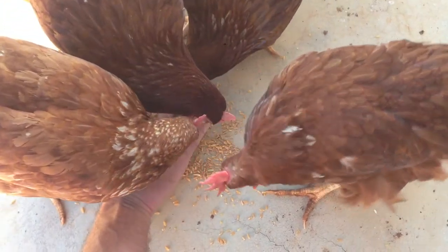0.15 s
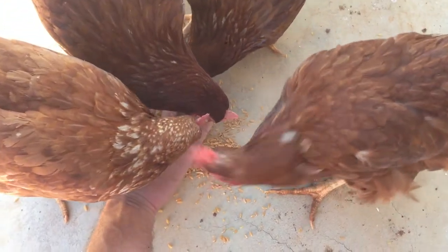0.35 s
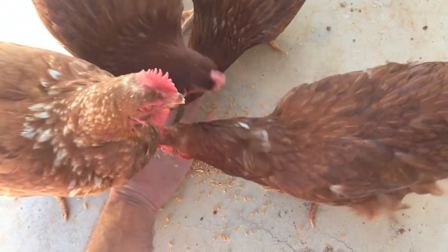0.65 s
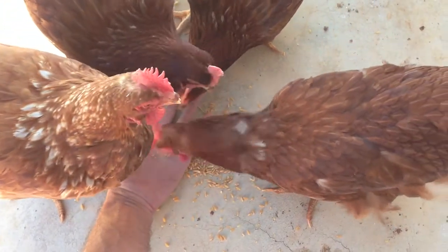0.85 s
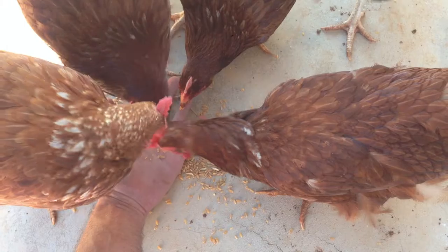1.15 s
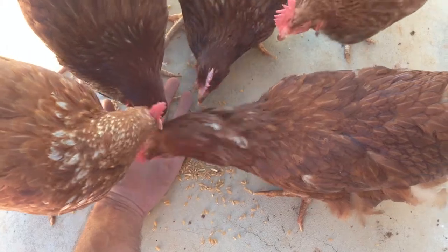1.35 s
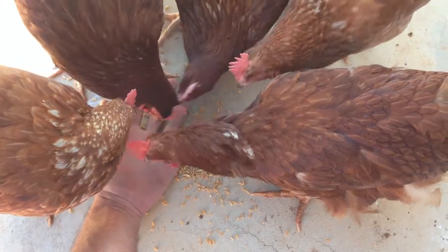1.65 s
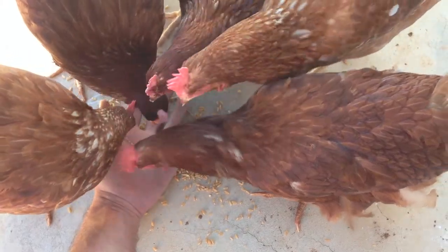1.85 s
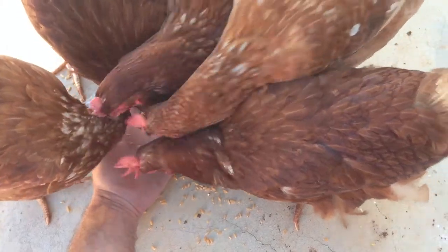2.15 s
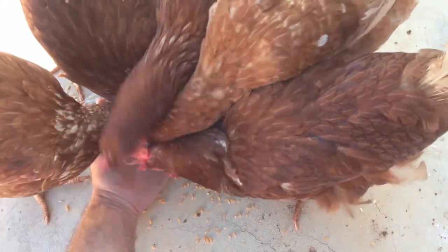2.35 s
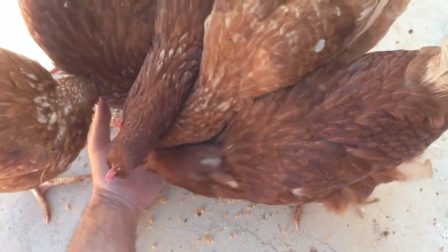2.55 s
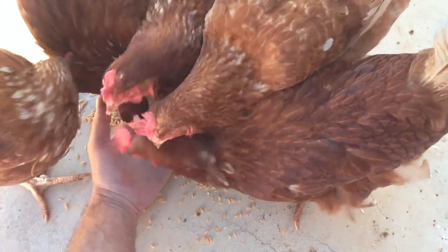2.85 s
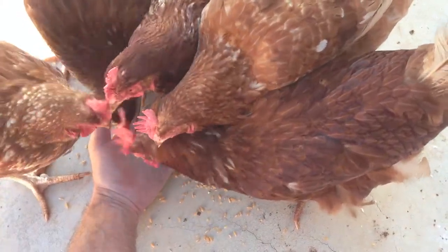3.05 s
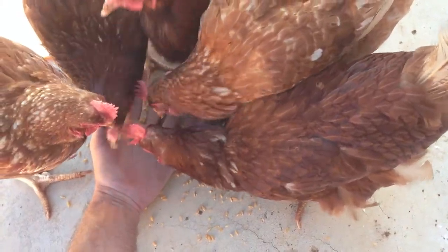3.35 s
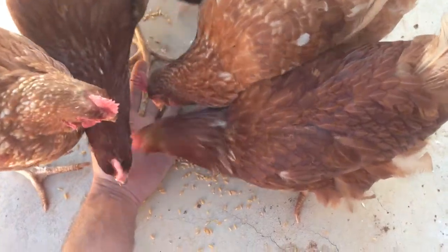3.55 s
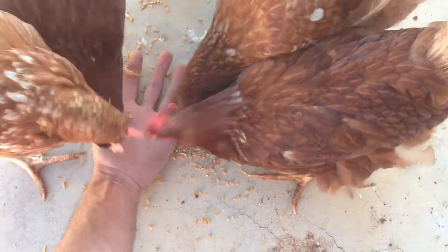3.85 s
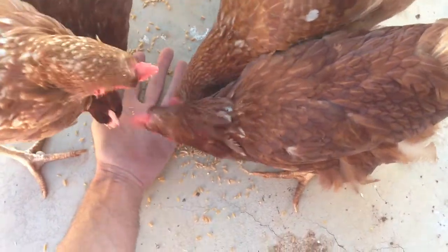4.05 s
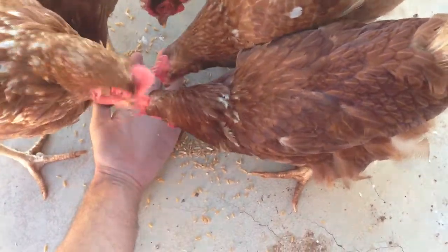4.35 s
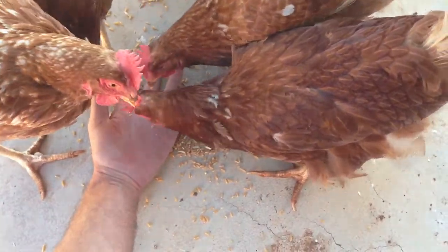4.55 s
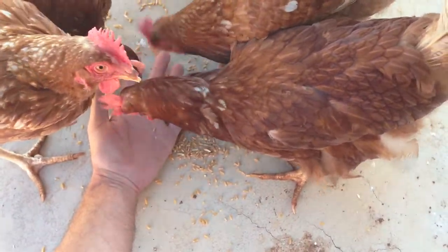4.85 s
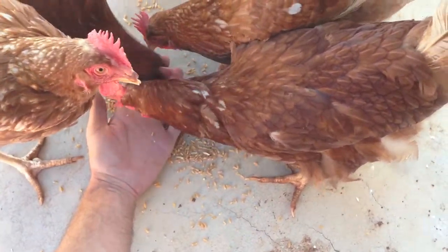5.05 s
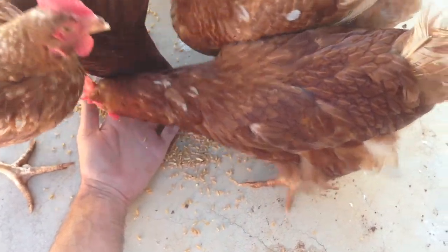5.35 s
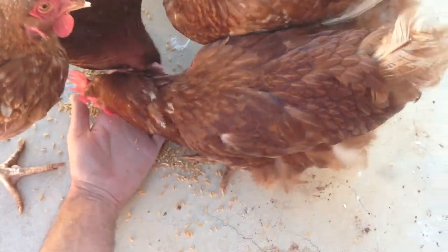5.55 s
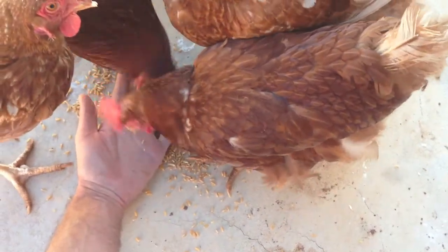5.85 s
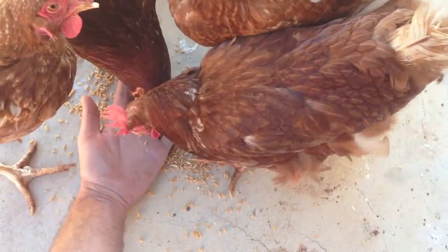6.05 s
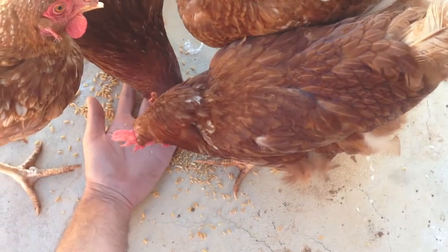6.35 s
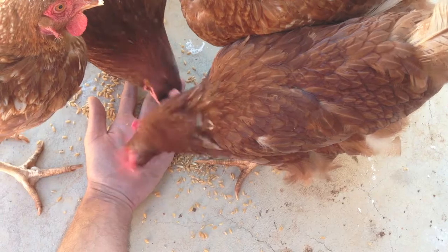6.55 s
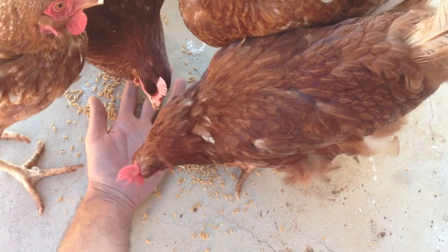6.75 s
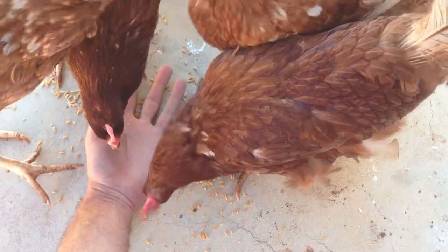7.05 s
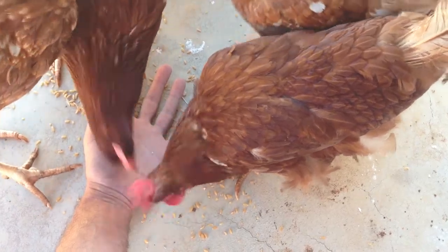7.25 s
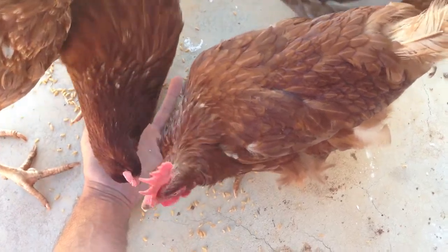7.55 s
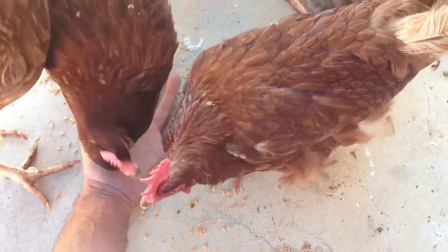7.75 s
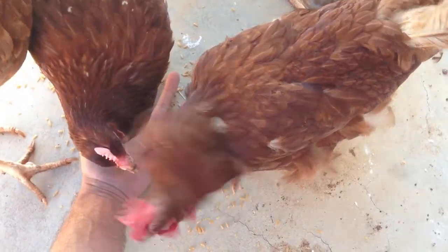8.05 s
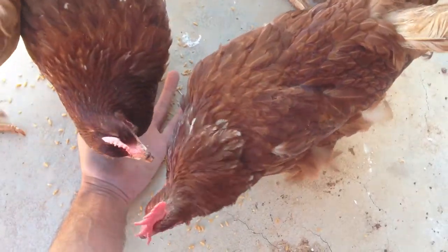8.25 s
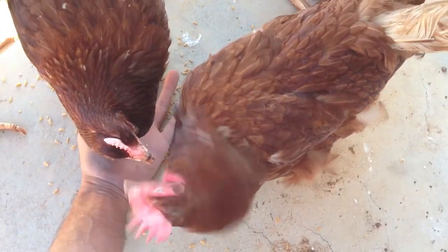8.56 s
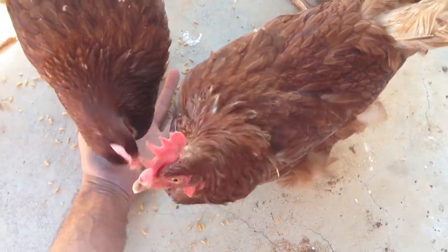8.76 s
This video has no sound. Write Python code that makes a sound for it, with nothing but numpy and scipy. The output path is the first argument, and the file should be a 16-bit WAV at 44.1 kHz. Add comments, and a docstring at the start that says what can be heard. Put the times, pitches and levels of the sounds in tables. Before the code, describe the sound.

Several hens feed from a hand on a concrete floor outdoors, very close to the microphone. Short calls and quick yelps open, then hoarse cackles, thin wavering whines and clear calls that tighten into rasps. Beaks tick on grain throughout, with soft thuds and feather rustle. A low croak precedes two loud climbing wails and a nasal whine, ending with a strong bump over faint air murmur.

```python
"""On a concrete floor outdoors, hens crowd close to the microphone round a hand that holds grain.
Stacks of gliding harmonics, coloured by a throat, give cackles that break into rasps, climbing wails,
yelps, whines and clucks; ringing modes give croak pops. Beaks tick as short rings with noise, soft blows
thud as brief low pulses, and shaped noise brushes as feathers, scuffs as bodies, and lies under it all as
a murmur with hiss. Sparse random echoes add faint reflections to the voices, ticks and thuds."""
import sys
import numpy as np
from scipy import signal
from scipy.fft import rfft, irfft, next_fast_len
from scipy.io import wavfile
from scipy.ndimage import uniform_filter1d

SR = 44100
rng = np.random.default_rng(int(sys.argv[2]) if len(sys.argv) > 2 else 0)


def output_pcm(signal):
    """Save a mono or channel-first signal as 16-bit PCM at the path in sys.argv[1].

    Samples are clipped to [-1, 1] before scaling.
    """
    pcm = np.clip(np.atleast_2d(signal).T, -1, 1) * 32767
    wavfile.write(sys.argv[1], SR, np.round(pcm).astype(np.int16))


N = 392049

# Background colour, shaping noise that is then levelled: [f/Hz, relative level/dB]
BACKGROUND = [(30, -37), (60, -30), (130, -6.5), (270, -1), (550, -8), (1000, -18.5), (1800, -23.5),
              (6200, -22), (15000, -22.5)]
BACKGROUND_DB = -64

# Feathers brushing past each other: [t/s, level/dB, half length/s]
BRUSHES = [(0.184, -58.5, 0.048), (0.9, -61.5, 0.05), (1.397, -57, 0.019), (2.401, -61, 0.013),
           (4.119, -64, .012), (4.337, -58.5, 0.01)]

# Rasp colour for each kind of hen, by name: [f/Hz, relative level/dB]
RASPS = { "hoarse": [(50, -36), (150, -12), (350, -7), (600, -6), (800, -1), (950, -3), (1130, 6),
         (1350, -2), (1650, -7), (2200, -13), (2750, -16), (3200, -24), (4100, -23), (9000, -41)],
         "reedy": [(50, -40), (150, -11), (330, -6), (600, -6), (800, -1), (960, -14), (1150, 0), (1400, 3),
         (1700, 2), (2000, -9), (2250, -27), (2500, -17), (2800, -12), (3000, -30), (3400, -18),
         (3900, -12), (4300, -26), (9000, -40)]}
HALF_LINES, HALF_BLUR = .7, .14  # strength of rasp lines between the harmonics, their unsteadiness/cycles

# Opening calls, one curve each: [t/s, f/Hz, fundamental level/dB,
#  second harmonic/dB and overtones/dB above the fundamental]
OPENING_CALLS = [
    [(.003, 547.6, -49.5, -21, -12), (.03, 505.3, -54.5, -2, -5), (.09, 514.2, -54, -15, -3.5),
     (.14, 567, -47, -24, -12.5), (.22, 531, -49, -26, -18), (.29, 549, -43, -36, -12),
     (.37, 568, -43, -28, -9), (.4, 589, -39.5, -16, -17), (.415, 610, -42, -8, -14)],
    [(.185, 526.4, -46, -12, -32), (.205, 488, -50, 1, -9), (.235, 465.7, -41, -20, -24),
     (.29, 455, -41, -10, -38), (.36, 469, -40, -16.5, -44), (.43, 493, -46, -10, -10.5),
     (.455, 470, -41, -20, -23), (.475, 333, -50, -20, -30)],
]
# Throat colour of their overtones: [f/Hz, level/dB]
OPENING_THROAT = [(1350, 7), (1530, 6), (1690, -3), (2040, -6), (2230, -37), (2550, -21), (2800, -12),
                  (3060, -23), (3350, -20), (3950, -8.5), (4500, -10.5), (5600, -36), (10000, -33)]
OPENING_RASP_DB = -66  # at the loudest point of the call

# Beak on grain: [t/s, bright snap level/dB, dull knock level/dB], both before their trims
PECKS = [(0.2867, -46, -69), (0.671, -44, -67), (0.886, -39, -65), (1.1582, -46, -63),
         (1.896, -42.5, -59.5), (2.2623, -46, -72), (2.4438, -36.5, -72), (2.8896, -60, -62),
         (2.991, -39, -82), (3.362, -44.5, -70), (3.5861, -35.5, -81), (3.654, -42.5, -72),
         (4.214, -48, -64.5), (4.668, -42, -61), (5.0291, -48, -58), (5.227, -43, -58.5), (5.466, -51, -66),
         (5.5653, -41.5, -81), (5.9612, -39.5, -66.5), (8.093, -38, -64)]
SNAP_TRIM_DB, KNOCK_TRIM_DB = -2, 10
# Ringing modes of the beak: [nominal f/Hz, relative level/dB, t60/s]
BEAK_MODES = [(4360, -22, .016), (6260, 5.5, 0.018), (7990, 4.5, 0.019), (10000, 8.5, 0.0057),
              (13400, 4, .01)]

# Bouts of yelps: [start t/s, end t/s]
YELP_BOUTS = [(.412, 0.622), (.8, 1.153)]
# Yelps that swoop from a thin falsetto to a full note: [t/s, hold/s, swoop into it/s, falsetto f/Hz,
#  falsetto level/dB, note f/Hz, note fundamental level/dB, second harmonic/dB and overtones/dB above it]
YELPS = [(0.425, 0.0034, 0.0082, 933, -52, 839, -48, -22, -14),
         (0.466, 0.0038, 0.02, 1059, -64, 690, -48.5, -20, -10),
         (0.496, 0.0048, .012, 967, -56.5, 797, -49, -7, -3),
         (.518, 0.0016, 0.0091, 1172, -47, 860, -53, -18, -2),
         (.545, 0.075, 0.018, 1130, -53, 598.5, -34.5, -13, -18.5),
         (0.823, 0.013, .017, 863, -50, 577.4, -35, -14.5, -27),
         (0.889, 0.012, 0.037, 865, -54.5, 630, -37, -7, -16),
         (0.931, 0.00473, 0.0129, 896, -56, 730, -44.5, -3, -11),
         (0.972, 0.056, 0.019, 894, -45.5, 566, -32, -19, -17.5),
         (1.04, 0.0087, 0.0044, 760, -45, 733, -42.5, -3, -9),
         (1.088, 0.068, .022, 945, -48, 604, -30, -13.5, -12)]
CATCH_HOLD_S, YELP_RASP_DB = .007, -60  # spread of the full voice around each note; rasp level
FALSETTO_WOBBLE, FALSETTO_FLUTTER_DB = 0.027, 3.5  # unsteadiness in pitch (share) and level, rms
# Falsetto colour against pitch: [f/Hz, second harmonic/dB above the fundamental]
FALSETTO_SECOND = [(650, -7), (800, -1), (930, -1), (1060, -15)]
FALSETTO_OVERTONES_DB = -13
# Throat colour of the yelps' overtones: [f/Hz, level/dB]
YELP_THROAT = [(1400, 15), (1750, -1.5), (2050, -5), (2350, -25), (2900, -9.5), (3350, -29), (3850, -12),
               (4300, -20.5), (6000, -35.5), (10000, -39)]

# Short whines, gliding evenly: [start t/s, end t/s, first f/Hz, last f/Hz before the droop,
#  fundamental level/dB, second harmonic/dB and overtones/dB above it]
WHINES = [(0.958, 1.059, 401, 406, -47.5, -5.5, -27), (1.135, 1.24, 869, 1160, -52, -29, -22),
          (6.232, 6.325, 372, 435.5, -43, -9, -31), (7.561, 7.658, 441, 452, -44, -16, -45)]
# One moan, with the columns of the short whines
MOAN = (8.718, 9, 309, 354, -63, 10.5, 1.5)
# Throat colour of the whines' overtones: [f/Hz, level/dB]
WHINE_THROAT = [(1000, 24.5), (1400, 12), (2050, -5), (2600, -17), (3150, -9.5), (3800, -22.5),
                (10000, -41)]
# Throat colour of the moan's overtones: [f/Hz, level/dB]
MOAN_THROAT = [(1300, 12.5), (1600, -2.5), (2300, -4), (2900, -20), (3300, -3.5), (3800, -33), (9000, -42)]
WHINE_ATTACK_S, DROOP, DROOP_S = 0.014, 0.22, .012  # DROOP: share of pitch lost at the stop
WHINE_FADE_S, WHINE_FADE_DB = 0.014, -10  # it weakens before it stops

# Soft blows on the palm and the microphone's holder: [t/s, level/dB before the low cut, f/Hz]
THUDS = [(1.041, -38.5, 173), (1.059, -34, 182), (1.223, -35.5, 203), (1.254, -27, 197), (1.468, -41, 160),
         (1.704, -35, 215), (1.719, -42, 116), (5.064, -49, 280), (6.601, -31, 153), (8.732, -18.5, 226),
         (8.764, -32, 153)]

# Bodies rubbing against the hand and the microphone's holder: [t/s, level/dB, half length/s]
RUBS = [(1.197, -53, 0.044), (1.788, -52, 0.025), (8.67, -55.5, 0.12)]

# Cackles: [start t/s, break t/s, end t/s, attack/s, catch/s, time the break takes/s,
#  clear f/Hz, its climb/share per s, pressed f/Hz, its climb/share per s, clear level/dB, pressed level/dB,
#  second harmonic/dB when clear and when pressed, overtones/dB, their gain/dB toward the end,
#  rasp level/dB at the break, last push/0-1, treble tilt/dB, kind of hen]
CACKLES = [ (1.323, 1.334, 1.536, 0.017, 0.0023, 0.0071, 644, -0.057, 589.6, -0.0096, -46, -39, -5, -10.5, -32, 16.5, -45, .3, 7.5, "hoarse"),
           (1.526, 1.738, 1.908, 0.0074, 0.031, 0.0075, 602.4, -0.072, 602.5, -0.31, -40, -39.5, -13, -11.5, -23, 20.5, -47.5, 0, -2.5, "hoarse"),
           (4.474, 4.688, 4.883, 0.098, 0.057, 0.056, 498.2, 0.13, 511, 0.27, -42, -39.5, -4.5, -20, -15, 9, -52.5, 0.4, -16, "reedy"),
           (5.093, 5.241, 5.427, 0.036, 0.038, 0.0036, 566.6, 0.34, 531.4, 0.38, -39.5, -36.5, -28.5, -33, -13.5, 9.5, -53, 0.83, -9, "reedy"),
           (5.637, 5.79, 5.895, 0.012, 0.039, .007, 598.4, .5, 561.3, -0.37, -36, -33.5, -16, -20, -15, 9, -49.5, 0.8, -1, "reedy"),
           (6.102, 6.243, 6.404, 0.019, 0.04, 0.0044, 591.6, 0.15, 564, 0.21, -36, -32, -7, -17, -10.5, 4.5, -51, 0.85, -1, "reedy"),
           ]
CATCH_DIP, CATCH_SECOND_DB, CATCH_OVERTONES_DB = .095, 4, -1.5  # share of pitch lost; colour change
SWITCH_S, RASP_GROWS_S = 0.0037, 0.015  # time to change register, and extra time to turn hoarse
PRESS_SWELL_DB, RASP_CLEARS_DB = 2, -17.5  # change from the break to the end
BRIGHTEST_AT = 0.75  # share of the way from the break to the end
PUSH_S, PUSH_DB, PUSH_SECOND_DB = 0.025, 3.5, 11  # a last push before the cut-off
SCOOP, SCOOP_S, END_DROOP = 0.29, 0.0075, 0.08  # share of pitch a cackle starts high by, and loses as it stops
# Throbbing stretches: [start t/s, end t/s, first beat f/Hz, last beat f/Hz, depth/0-1]
THROBS = [(1.332, 1.531, 66.7, 27.6, 0.51), (1.729, 1.819, 40.7, 22, 0.58)]
THROB_SAG = 0.013  # pitch change, as a share, per unit of throb gain
# Instants when the pressed voice slips up: [t/s, half length/s, rise/share of pitch, overtones change/dB]
CRACKS = [(1.807, 0.012, 0.06, 3.5), (4.83, 0.012, 0.092, -9), (5.266, .01, 0.15, -14),
          (6.238, 0.012, 0.046, -5)]
# Throat colour of cackle overtones for each kind of hen, by name: [f/Hz, level/dB]
THROATS = { "hoarse": [(1750, -2), (1810, -7), (2370, -11), (2950, -13), (3550, -20), (4150, -20),
           (4700, -32), (10000, -38)], "reedy": [(1400, 1), (1680, -4.5), (1800, -12.5), (2020, -12),
           (2230, -33), (2420, -21), (2700, -20), (2820, -16.5), (3000, -32), (3200, -23), (3400, -26),
           (3850, -12), (4200, -29), (4500, -29.5), (6000, -45), (8300, -37.5), (10000, -46)]}

# Clucks: [start t/s, end t/s, middle f/Hz, fundamental level/dB,
#  second harmonic/dB and overtones/dB above it]
CLUCKS = [(3.743, 3.795, 275, -43.5, 2.5, -19.5), (7.099, 7.121, 277, -48, 13.5, -16.5),
          (7.509, 7.575, 270.2, -42.5, 5.5, -22.5)]
# Throat colour of the clucks' overtones: [f/Hz, level/dB]
CLUCK_THROAT = [(800, 23), (1100, 13), (1400, -12), (1700, -0.5), (2250, -24), (9000, -34)]
CLUCK_ATTACK_S, CLUCK_CLIMB_PER_S = 0.017, 1

# Wavering whines, one curve each: [t/s, f/Hz, fundamental level/dB]
WAVERING_WHINES = [
    [(3.79, 554, -59), (3.836, 642, -45.5), (3.888, 681, -58.5), (3.916, 840, -47), (3.972, 884, -45.5),
     (4.024, 927, -58), (4.07, 956, -47.5), (4.18, 993, -50), (4.192, 855, -49.5), (4.205, 790, -70)],
    [(4.274, 860, -61), (4.29, 1142, -60), (4.33, 1035, -53.5), (4.394, 1102, -47.5), (4.4, 1037, -54),
     (4.414, 790, -52)],
    [(5.94, 390, -52), (5.988, 317, -62.5), (6.03, 309, -42), (6.056, 380, -43), (6.115, 427, -46.5)],
    [(6.52, 428, -66), (6.54, 376.5, -48.5), (6.572, 394, -56), (6.61, 380.4, -45.5), (6.694, 469, -44.5),
     (6.71, 600, -44), (6.735, 600, -71)],
]
# Their colour against pitch: [f/Hz, second harmonic/dB above the fundamental]
WHINE_SECOND = [(310, 0), (380, -11.5), (450, 2), (600, -9.5), (850, -19.5), (1000, -30)]
# The same for the overtones: [f/Hz, overtones/dB above the fundamental]
WHINE_OVERTONES = [(310, -28.5), (400, -37), (650, -22), (1000, -23)]

# Single pops of a slow throaty croak: [t/s, peak level/dB]
CROAKS = [(7.128, -38.5), (7.148, -39), (7.168, -40.5), (7.192, -49), (7.236, -46)]
# Ringing modes of a croak: [nominal f/Hz, relative level/dB, t60/s]
CROAK_MODES = [(586, 10, 0.055), (880, 12, 0.03), (1154, 10, 0.04)]

# Long wails: [start t/s, end t/s, first f/Hz, top f/Hz, bend of the climb, first level/dB, last level/dB,
#  first and last second harmonic/dB, overtones/dB, rasp level/dB before it clears]
LONG_WAILS = [(7.623, 8.161, 484.4, 573.7, 1.8, -36, -27, -11.5, -9.5, -22, -61),
              (8.26, 8.561, 508.3, 628.6, 1.35, -38, -36, -9, -2.5, -17.5, -44)]
# Throat colour of each wail's overtones, one list per wail: [f/Hz, level/dB]
WAIL_THROATS = [
    [(1530, 4), (1720, -14.5), (1900, -10), (2060, -14.5), (2300, -6), (2870, -6.5), (3060, -17.5),
     (3550, -8.5), (4050, -24), (4600, -29), (6500, -36), (8000, -27.5), (10000, -49)],
    [(1680, 6), (1860, 0), (2090, -15), (2260, -6), (2500, -5.5), (2660, -6), (2850, -4), (3100, -10.5),
     (3250, -12), (3450, -10), (3700, -13.5), (4340, -22.5), (6500, -31), (8000, -32), (10000, -47)],
]
WAIL_ATTACK_S, WAIL_SAG_S, WAIL_SAG_PER_S = 0.036, .062, 0.56
WAIL_BRIGHTEN_DB, WAIL_HOARSE_S = 6, 0.044  # brightening over the call; hoarse time at either end
WAIL_CLEARS_DB = -9  # a wail ends less hoarse than it starts
BEAK_SHUT_DB, BEAK_OPENS_AT = -11, 0.16  # overtones are muffled for this first share of a wail

# One long nasal whine: [t/s, f/Hz, second harmonic level/dB, overtones/dB above the second harmonic]
NASAL_WHINE = [(7.912, 279.7, -45.5, -26), (7.983, 308.3, -40.5, -22.5), (8.005, 371.3, -47, -20),
               (8.1, 452.8, -37.5, -36), (8.182, 464.3, -42, -23.5), (8.27, 487, -37.5, -25),
               (8.31, 471, -38.5, -21), (8.461, 480, -34, -31.5), (8.525, 533.6, -32.5, -27),
               (8.54, 503, -32.5, -25), (8.568, 535, -33.5, -21.5), (8.619, 517, -33.5, -21.5),
               (8.708, 538, -33.5, -21.5), (8.737, 562, -39, -37)]
# Its colour against pitch: [f/Hz, second harmonic/dB above the fundamental]
NASAL_SECOND = [(290, 2.5), (385, -3), (440, 12), (475, 18.5), (520, 7)]
NASAL_RASP_DB, NASAL_RASP_S = -46.5, 0.055  # it ends in a rasp

RELEASE_S, SILENT_DB = 0.016, -33  # release of the calls, and gain at their outer edges
EDGE_HZ = 15350  # top of the band


def amp(db):
    """Turns decibels into gain."""
    return 10 ** (np.asarray(db) / 20)


def evened(x):
    """Levels a sound to rms 1."""
    return x / np.sqrt(np.mean(x ** 2) + 1e-20)


def read(points, hz):
    """A spectrum joined by straight lines on a log-frequency axis."""
    f, value = np.transpose(points)
    return np.interp(np.log(hz + 1), np.log(f + 1), value)


def filtered(x, points):
    """Filters x by a spectrum."""
    size = next_fast_len(len(x))
    gain = amp(read(points, np.fft.rfftfreq(size, 1 / SR)))
    return irfft(rfft(x, size) * gain, size)[:len(x)]


def coloured(x, points):
    """Filters x by a spectrum; rms 1."""
    return evened(filtered(x, points))


def add(mix, s, sound):
    """Lays a sound into the mix at s seconds, cut off at the end of the mix."""
    part = mix[max(round(s * SR), 0):][:len(sound)]
    part += sound[:len(part)]


def wander(size, hz):
    """Smooth chance that moves up to about hz times a second; rms near 1."""
    full = next_fast_len(size + SR // 10)
    f = np.fft.rfftfreq(full, 1 / SR)
    spectrum = rfft(rng.standard_normal(full)) * np.exp(-.5 * (f / hz) ** 2)
    return evened(irfft(spectrum, full))[:size]


def ring(modes, t, spread):
    """Dying modes, a little different in pitch at each blow; peak 1."""
    x = np.zeros(len(t))
    for hz, db, t60 in modes:
        shifted_hz = hz * (1 + spread * rng.uniform(-1.4, 1))
        x += amp(db - 60 * t / t60) * np.sin(2 * np.pi * shifted_hz * t)
    return x / abs(x).max()


def step(t, at, width):
    """A smooth change from 0 to 1 around time at."""
    return .5 + .5 * np.tanh((t - at) / width)


def bursts(t, strokes):
    """Sum of bell-shaped noise strokes."""
    return sum(amp(db) * np.exp(-((t - s) / width) ** 2) for s, db, width in strokes)


def call_span(start, end, attack):
    """Times of a call, its progress from 0 to 1, and the dB of its attack and release."""
    t = np.arange(start, end, 1 / SR)
    shut = np.maximum(1 - (t - start) / attack, 0) ** 2 + np.maximum(1 - (end - t) / RELEASE_S, 0) ** 2
    return t, (t - start) / (end - start), SILENT_DB * shut


def follow(curve):
    """Times, pitch and level along a curve."""
    s, hz, db = np.transpose(curve)
    t, _, gate_db = call_span(s[0] - .003, s[-1] + 0.006, 0.002)
    return t, np.interp(t, s, hz), np.interp(t, s, db) + gate_db


def background():
    """A low outdoor murmur of air that swells slightly, and even hiss."""
    air = coloured(rng.standard_normal(N), BACKGROUND)
    murmur = signal.sosfiltfilt(signal.butter(2, 600, fs=SR, output="sos"), air)
    hiss = air - murmur
    swell = amp(1.3 * wander(N, 10))
    return amp(BACKGROUND_DB) * (hiss + murmur * swell)


def jostling():
    """Feathers brush in short strokes; claws and beaks shift small grains."""
    t = np.arange(N) / SR
    strokes = amp(-70 + 2.73 * wander(N, 20)) + bursts(t, BRUSHES)
    feather_colour = [(200, -7.0), (900, 3.5), (4000, -2.0), (6500, -5.5), (14000, -13.5)]
    feathers = coloured(rng.standard_normal(N), feather_colour) * strokes
    # About 25 grains a second, of uneven strength, each a dying puff of noise
    strength = amp(7.4 * np.minimum(rng.exponential(1, N), 3)) * (rng.random(N) < 25 / SR)
    grains = signal.oaconvolve(strength, np.exp(-t[:SR // 50] / 0.0027))[:N] * rng.standard_normal(N)
    return feathers + amp(-80) * coloured(grains, [(500, -32.0), (3500, -6.5), (14000, -6.0)])


def hens():
    """All the voices, each kind of call with its own throat and unsteadiness."""
    out = np.zeros(N)
    for curve in OPENING_CALLS:
        add(out, *call(opening_call(curve), OPENING_THROAT, jitter=.012, air_db=-28))
    for row in YELP_BOUTS:
        add(out, *call(yelps(*row), YELP_THROAT, jitter=0.011, air_db=-39, shimmer_db=3, hen="reedy"))
    whines = [whine(*row) for row in WHINES]
    whines += [wavering_whine(curve) for curve in WAVERING_WHINES]
    whines.append(nasal_whine())
    for controls in whines:
        add(out, *call(controls, WHINE_THROAT, jitter=.008, air_db=-26, waver=.006, shimmer_db=1.3))
    for *row, tilt_db, hen in CACKLES:
        throat = tilted(THROATS[hen], tilt_db)
        add(out, *call(cackle(*row), throat, jitter=0.0087, air_db=-31.5, shimmer_db=1.9, hen=hen))
    for row in CLUCKS:
        add(out, *call(cluck(*row), CLUCK_THROAT, jitter=0.0085, air_db=-13, shimmer_db=3))
    for row, throat in zip(LONG_WAILS, WAIL_THROATS):
        add(out, *call(wail(*row), throat, jitter=.007, air_db=-37, waver=.006, shimmer_db=3.2))
    add(out, *call(whine(*MOAN), MOAN_THROAT, jitter=.007, air_db=-14, shimmer_db=1.5))
    return out + croaks()


def call(controls, throat, jitter, air_db, waver=0.0068, shimmer_db=3.5, hen="hoarse"):
    """The syrinx gives a stack of harmonics; in a rasp cycles alternate unevenly and puff air."""
    t, hz, db, second_db, upper_db, rasp = controls
    size = len(t)
    rough = np.clip(rasp / amp(-42), 0, 1)
    turns = np.cumsum(hz * (1 + (waver + .01 * rough) * wander(size, 35))) / SR
    slip = (jitter + .03 * rough) * wander(size, 200)  # timing error in cycles

    def harmonic(k):
        """Each one flutters, feels the timing error k-fold, and is delayed by the throat."""
        delay = 0.43 * np.sqrt(k - 1)
        return amp(shimmer_db * wander(size, 34)) * np.cos(2 * np.pi * (k * (turns + slip) - delay))

    stack = sum((k * hz < 10500) * harmonic(k) for k in range(3, 17))
    overtones = filtered(amp(db + upper_db) * stack, throat)
    fundamental = np.cos(2 * np.pi * (turns + .5 * slip))
    voice = amp(db) * (fundamental + amp(second_db) * harmonic(2)) + overtones
    # Alternating cycles put lines halfway between the harmonics
    halves = sum(np.cos(2 * np.pi * ((k + .5) * turns + HALF_BLUR * wander(size, 85))) for k in range(8))
    pulse = .2 + np.exp(-(turns % 1) / .15)
    puffs = pulse * amp(2.5 * wander(size, 250)) * rng.standard_normal(size)
    husk = evened(coloured(puffs, RASPS[hen]) + HALF_LINES * coloured(halves, RASPS[hen]))
    sound = np.sqrt(2) * voice + husk * (rasp + amp(db + air_db))
    edges = np.clip(np.minimum(t - t[0], t[-1] - t) / 0.0019, 0, 1)
    return t[0], sound * edges


def opening_call(curve):
    """A slightly husky call whose colour shifts as it glides."""
    rows = np.array(curve)
    t, hz, db = follow(rows[:, :3])
    second_db, upper_db = (np.interp(t, rows[:, 0], column) for column in rows.T[3:])
    return t, hz, db, second_db, upper_db, amp(OPENING_RASP_DB + db - db.max())


def yard(x, t60=0.19):
    """Faint scattered reflections from floor and walls: sparse random echoes that die away."""
    t = np.arange(SR // 2) / SR
    taps = rng.standard_normal(len(t)) * (rng.random(len(t)) < 2500 / SR) * (t > .004)
    tail = taps * amp(-60 * t / t60)
    return signal.fftconvolve(x, tail / np.linalg.norm(tail))[:N]


def pecks():
    """A beak snaps on a grain with a short ring; loose grains scrape after it."""
    out, t = np.zeros(N), np.arange(SR // 20) / SR
    scatter = np.exp(-t / 0.0027) + 0.28 * np.exp(-t / 0.018)
    knock_colour = [(300, -23), (2000, -2), (3500, 10.0), (4500, 2), (6500, -11.0)]
    for s, snap_db, knock_db in PECKS:
        snap = ring(BEAK_MODES, t, spread=0.073) + 0.3 * scatter * rng.standard_normal(len(t))
        knock = coloured(rng.standard_normal(len(t)), knock_colour) * scatter
        add(out, s, amp(snap_db + SNAP_TRIM_DB) * snap + amp(knock_db + KNOCK_TRIM_DB) * knock)
    return out


def yelps(start, end):
    """The pitch swoops down from the falsetto, the note catches hold, then flips upward again."""
    t, _, gate_db = call_span(start, end, 0.013)
    (s, hold, swoop, top_hz, thin_db,
     note_hz, note_db, note_second_db, note_upper_db) = np.transpose(YELPS)
    corners = np.maximum.accumulate(np.column_stack([s - swoop, s, s + hold]).ravel())

    def path(falsetto, note):
        """Joins each yelp's falsetto, and the start and end of its note."""
        return np.interp(t, corners, np.column_stack([falsetto, note, note]).ravel())

    away = np.maximum(s - t[:, None], 0) + np.maximum(t[:, None] - s - hold, 0)
    full = np.exp(-(away.min(1) / CATCH_HOLD_S) ** 2)
    thin = 1 - full
    hz = uniform_filter1d(path(top_hz, note_hz), size=150)
    hz = hz * (1 + FALSETTO_WOBBLE * thin * wander(len(t), 100))
    falsetto_db = path(thin_db, thin_db) + FALSETTO_FLUTTER_DB * wander(len(t), 120)
    db = full * path(note_db, note_db) + thin * falsetto_db
    second_db = full * path(note_second_db, note_second_db) + thin * read(FALSETTO_SECOND, hz)
    upper_db = full * path(note_upper_db, note_upper_db) + thin * FALSETTO_OVERTONES_DB
    return t, hz, db + gate_db, second_db, upper_db, amp(YELP_RASP_DB + gate_db)


def whine(start, end, first_hz, last_hz, db, second_db, upper_db):
    """An even glide that droops as the air runs out."""
    t, u, gate_db = call_span(start, end, WHINE_ATTACK_S)
    hz = (first_hz + (last_hz - first_hz) * u) * (1 - DROOP * np.exp((t - end) / DROOP_S))
    fade_db = WHINE_FADE_DB * np.exp((t - end) / WHINE_FADE_S)
    return t, hz, db + gate_db + fade_db, second_db, upper_db, 0


def thuds():
    """Flesh gives way under a blow and springs back within a cycle or two."""
    out, t = np.zeros(N), np.arange(-SR // 40, SR // 20) / SR
    for s, db, hz in THUDS:
        cycles = hz * t
        push = np.cos(2 * np.pi * cycles) / np.cosh(cycles / 0.36)
        rub = coloured(rng.standard_normal(len(t)), [(40, -44), (120, -8), (350, 21), (3000, -49)])
        add(out, s + t[0], amp(db) * (push + amp(-13) * rub / np.cosh(t / 0.0044)))
    return signal.sosfiltfilt(signal.butter(2, 88, "high", fs=SR, output="sos"), out)


def rubs():
    """A soft, low scuffing as the birds lean in."""
    colour = [(40, -33), (110, -9), (220, -7), (450, -17), (2000, -22), (9000, -50)]
    return bursts(np.arange(N) / SR, RUBS) * coloured(rng.standard_normal(N), colour)


def cackle(start, crack, end, attack, catch_s, break_s, clear_hz, clear_climb, pressed_hz, climb,
           clear_db, pressed_db, clear_second_db, pressed_second_db, upper_db, brighten_db, rasp_db,
           last_push):
    """A low catch, a clear tone, then a rasp that swells and tightens into a loud, bright end."""
    t, _, gate_db = call_span(start, end, attack)
    catch = 1 - step(t, start + catch_s, SWITCH_S)
    pressed = step(t, crack, break_s)
    clear = 1 - pressed
    push = last_push * step(t, end - PUSH_S, SWITCH_S)
    effort = np.clip((t - crack) / (end - crack), 0, 1)
    beat = throb(t)

    clear_middle, pressed_middle = (start + catch_s + crack) / 2, (crack + end) / 2
    clear_path = clear_hz * (1 - CATCH_DIP * catch + clear_climb * (t - clear_middle))
    pressed_path = pressed_hz * (1 + climb * (t - pressed_middle))
    scoop = SCOOP * np.exp((start - t) / SCOOP_S)
    droop = END_DROOP * np.exp((t - end) / SCOOP_S)
    hz = (clear * clear_path + pressed * pressed_path) * (1 + scoop - droop + THROB_SAG * (beat - 1))

    db = clear * clear_db + pressed * (pressed_db + PRESS_SWELL_DB * (effort - .5))
    db = db + PUSH_DB * push + gate_db + 20 * np.log10(beat)
    second_db = clear * clear_second_db + pressed * pressed_second_db
    second_db = second_db + CATCH_SECOND_DB * catch + PUSH_SECOND_DB * push
    hoarse = step(t, crack, break_s + RASP_GROWS_S)
    rasp = hoarse * amp(rasp_db + RASP_CLEARS_DB * effort ** 3 + gate_db)
    opening = np.minimum(effort / BRIGHTEST_AT, 1)
    upper_db = upper_db + CATCH_OVERTONES_DB * catch + brighten_db * opening
    for s, width, rise, change_db in CRACKS:
        slipped = np.exp(-((t - s) / width) ** 4)
        hz = hz * (1 + rise * slipped)
        upper_db = upper_db + change_db * slipped
    return t, hz, db, second_db, upper_db, rasp


def throb(t):
    """Gain of the beat between the two sides of the syrinx; 1 where they keep together."""
    gain = np.ones(len(t))
    for start, end, first_hz, last_hz, depth in THROBS:
        left = end - t
        beats = left * (last_hz + .5 * (first_hz - last_hz) * left / (end - start))
        apart = step(t, start, SWITCH_S) * (1 - step(t, end + SWITCH_S, SWITCH_S))
        gain *= abs(1 - depth * apart * np.exp(2j * np.pi * beats))
    return gain


def tilted(throat, tilt_db, from_hz=1700):
    """A throat whose treble is raised or lowered over one octave."""
    return [(hz, db + tilt_db * np.clip(np.log2(hz / from_hz), 0, 1)) for hz, db in throat]


def cluck(start, end, hz, db, second_db, upper_db):
    """One short, low note that lifts a little."""
    t, _, gate_db = call_span(start, end, CLUCK_ATTACK_S)
    lifting_hz = hz * (1 + CLUCK_CLIMB_PER_S * (t - t.mean()))
    return t, lifting_hz, db + gate_db, second_db, upper_db, 0


def wavering_whine(curve):
    """The colour follows the pitch as the harmonics slide through the throat's resonances."""
    t, hz, db = follow(curve)
    return t, hz, db, read(WHINE_SECOND, hz), read(WHINE_OVERTONES, hz), 0


def croaks():
    """Each pop of a throaty croak rings a few dying modes."""
    out, t = np.zeros(N), np.arange(SR // 20) / SR
    for s, db in CROAKS:
        add(out, s, amp(db) * ring(CROAK_MODES, t, spread=0.16))
    return out


def wail(start, end, first_hz, top_hz, bend, first_db, last_db, first_second_db, last_second_db,
         upper_db, rasp_db):
    """Rising effort lifts pitch, level and brightness; the overtones come in as the beak opens."""
    t, u, gate_db = call_span(start, end, WAIL_ATTACK_S)
    top = end - WAIL_SAG_S
    climb = np.minimum((t - start) / (top - start), 1) ** bend
    sag = WAIL_SAG_PER_S * np.maximum(t - top, 0)
    hz = (first_hz + (top_hz - first_hz) * climb) * (1 - sag)
    db = first_db + (last_db - first_db) * u + gate_db
    second_db = first_second_db + (last_second_db - first_second_db) * u
    muffle_db = BEAK_SHUT_DB * (1 - step(u, BEAK_OPENS_AT, BEAK_OPENS_AT / 2))
    bright_db = WAIL_BRIGHTEN_DB * (u - .5) + muffle_db
    hoarse = 1 - step(np.minimum(t - start, end - t), WAIL_HOARSE_S, RASP_GROWS_S)
    rasp = hoarse * amp(rasp_db + WAIL_CLEARS_DB * u + gate_db)
    return t, hz, db, second_db, upper_db + bright_db, rasp


def nasal_whine():
    """The second harmonic rides a throat resonance; the voice ends hoarse."""
    rows = np.array(NASAL_WHINE)
    t, hz, carried_db = follow(rows[:, :3])
    second_db = read(NASAL_SECOND, hz)
    upper_db = second_db + np.interp(t, rows[:, 0], rows[:, 3])
    rasp = amp(NASAL_RASP_DB) * step(t, t[-1] - NASAL_RASP_S, SWITCH_S)
    return t, hz, carried_db - second_db, second_db, upper_db, rasp


def scene():
    """Voices, ticks and thuds with their reflections, over brushing, rubbing and background."""
    near = hens() + pecks() + thuds()
    reflections = amp(-24) * yard(near)
    return (near + reflections + jostling() + rubs() + background())[None]


def record(dry):
    """The recorder's band limit: a steep low-pass."""
    low_pass = signal.firwin(511, EDGE_HZ, window=("kaiser", 7), fs=SR)
    return signal.oaconvolve(dry, low_pass[None], "same")


dry = scene()
out = record(dry)
output_pcm(out)
```